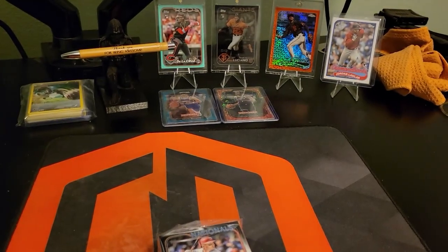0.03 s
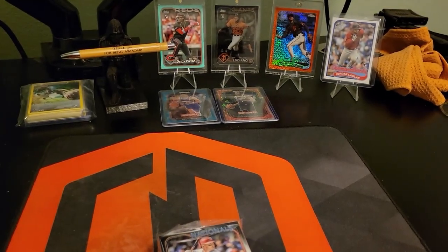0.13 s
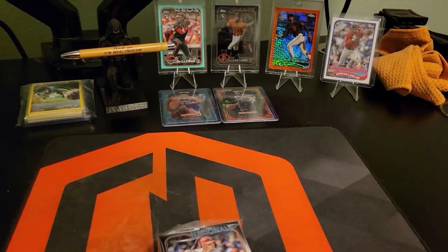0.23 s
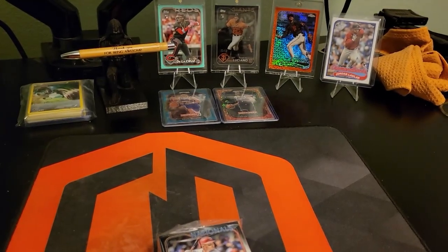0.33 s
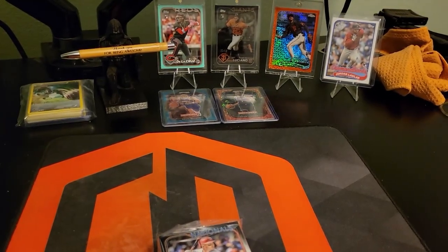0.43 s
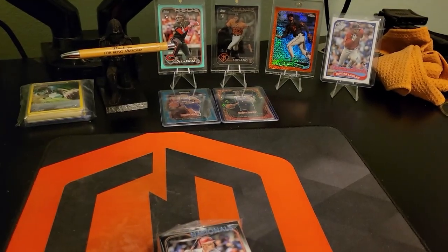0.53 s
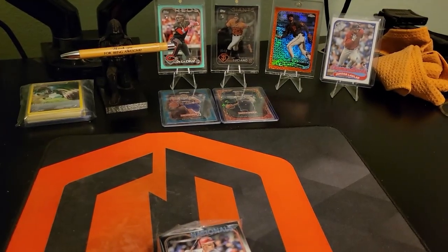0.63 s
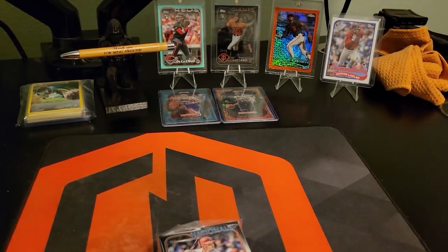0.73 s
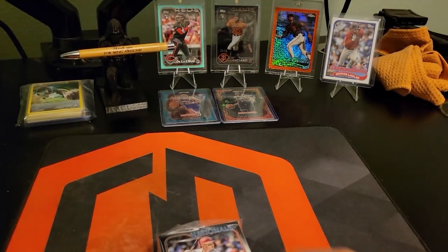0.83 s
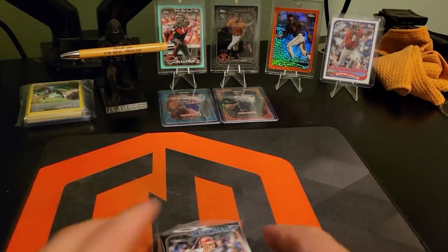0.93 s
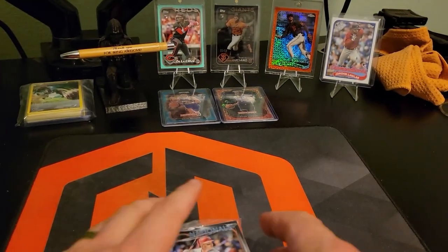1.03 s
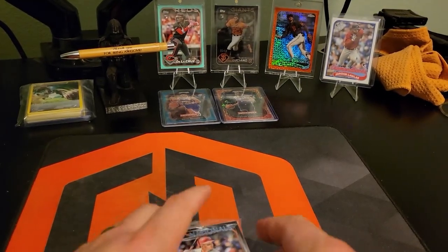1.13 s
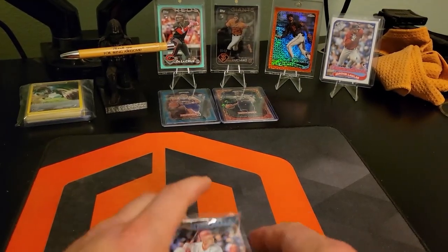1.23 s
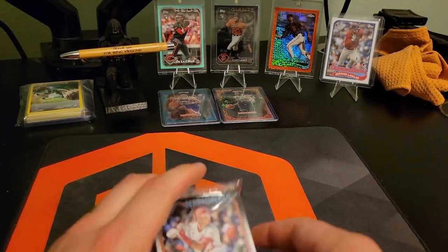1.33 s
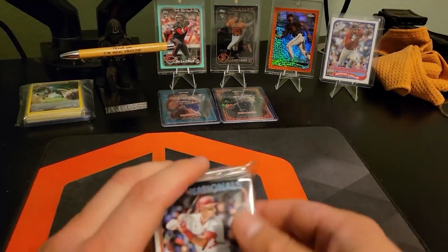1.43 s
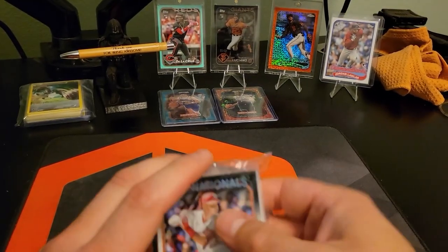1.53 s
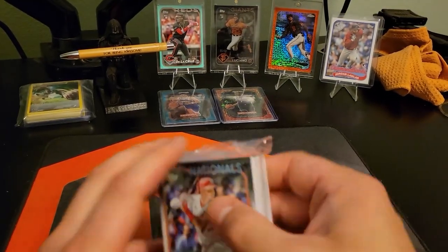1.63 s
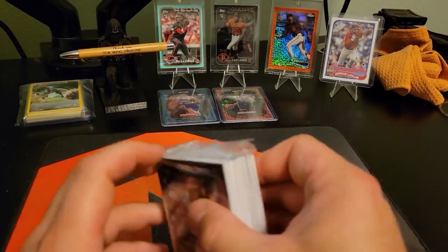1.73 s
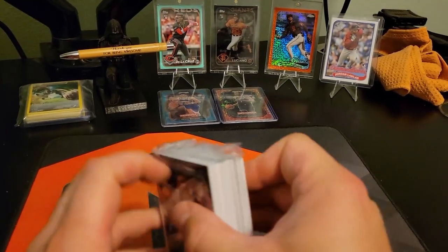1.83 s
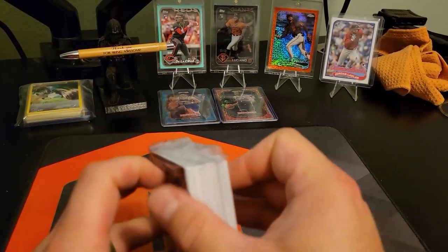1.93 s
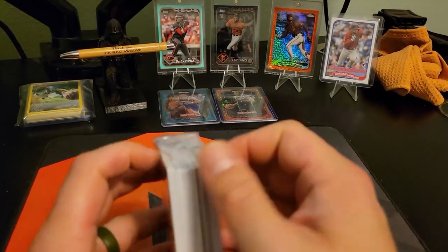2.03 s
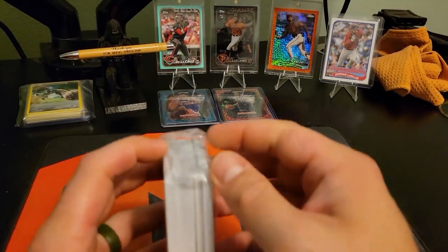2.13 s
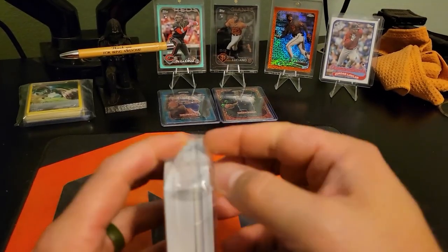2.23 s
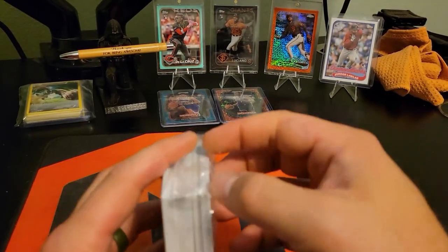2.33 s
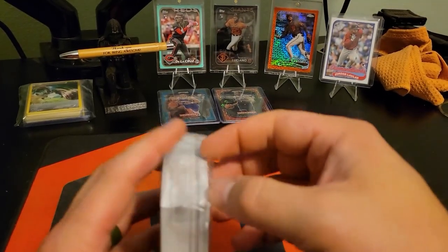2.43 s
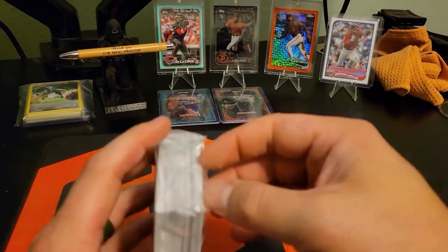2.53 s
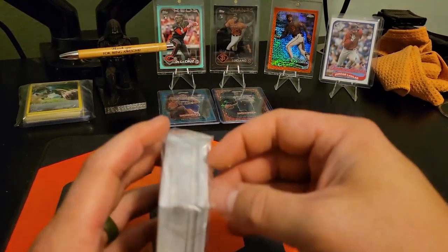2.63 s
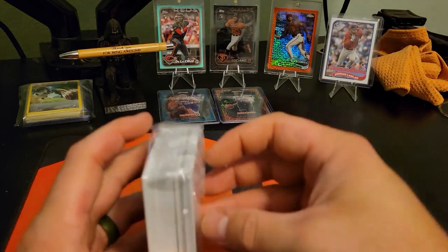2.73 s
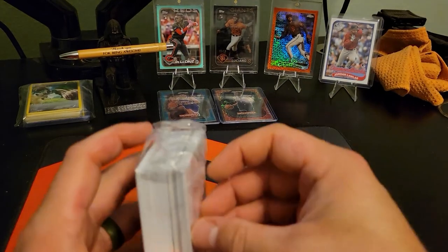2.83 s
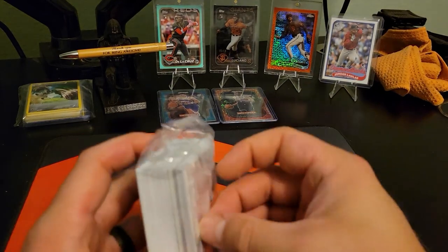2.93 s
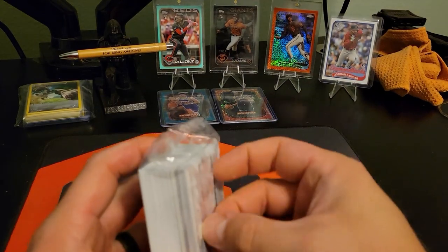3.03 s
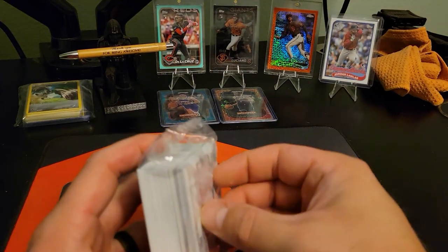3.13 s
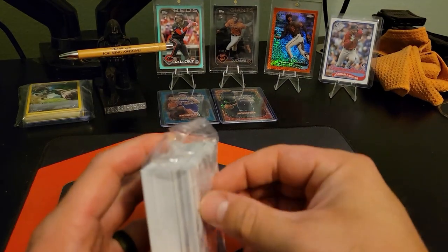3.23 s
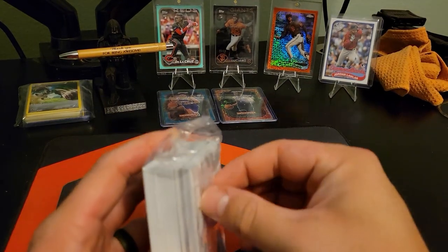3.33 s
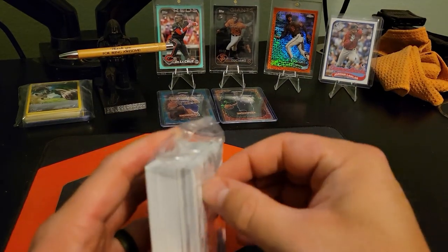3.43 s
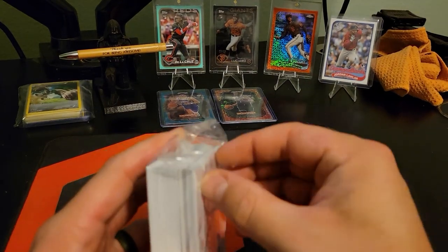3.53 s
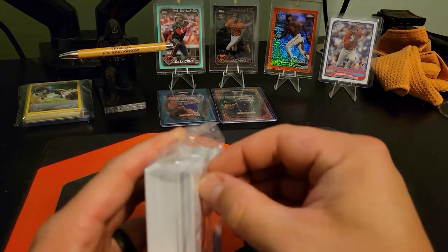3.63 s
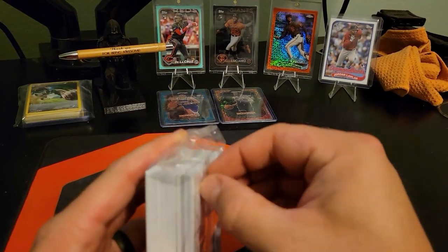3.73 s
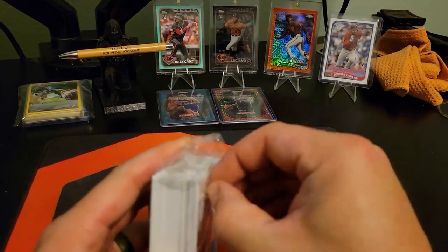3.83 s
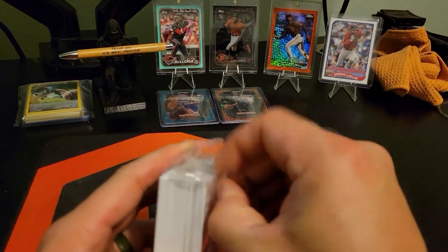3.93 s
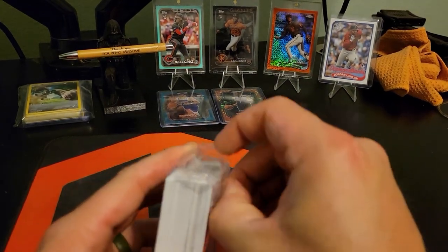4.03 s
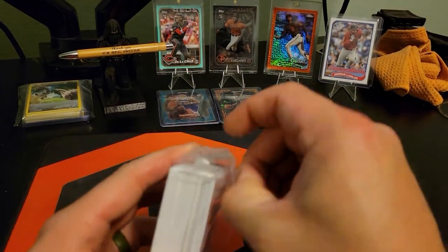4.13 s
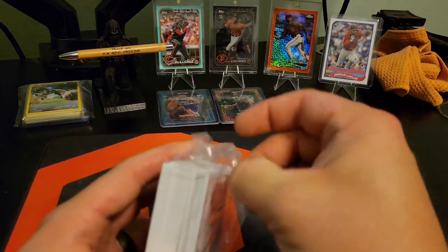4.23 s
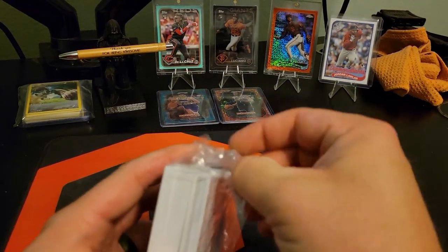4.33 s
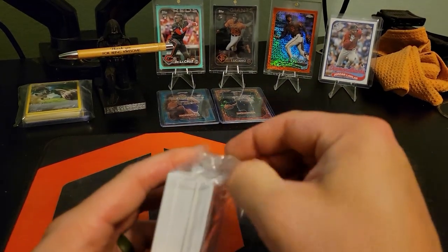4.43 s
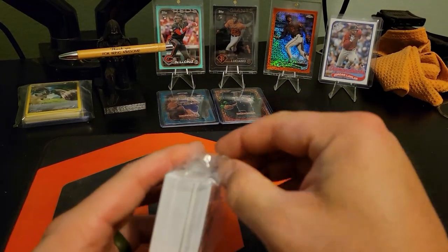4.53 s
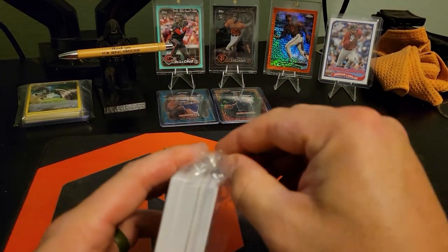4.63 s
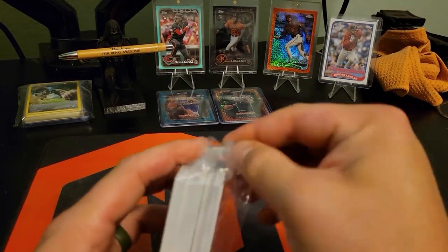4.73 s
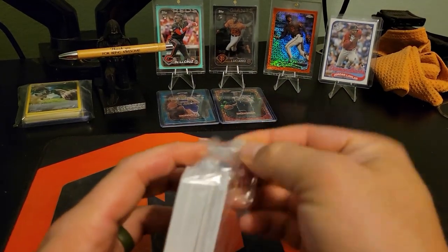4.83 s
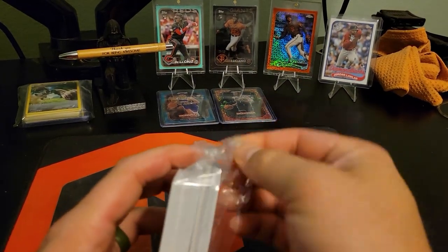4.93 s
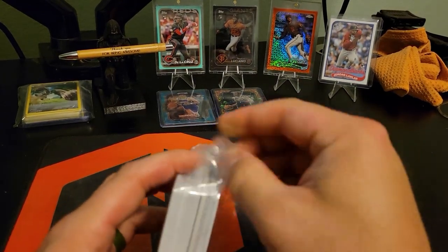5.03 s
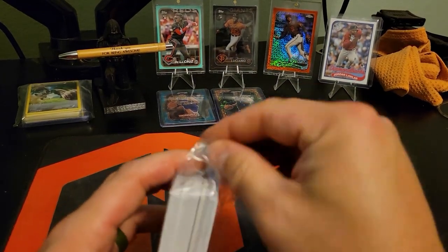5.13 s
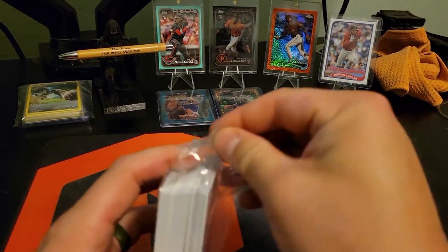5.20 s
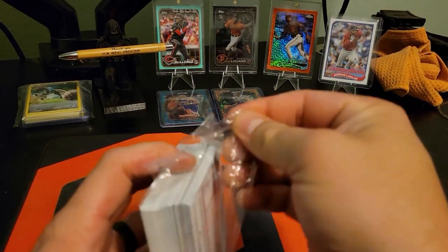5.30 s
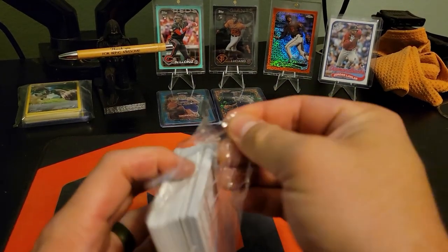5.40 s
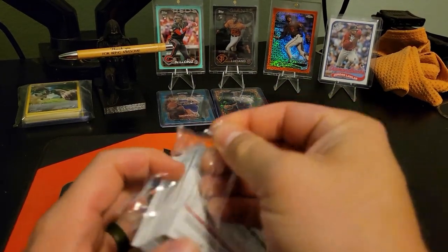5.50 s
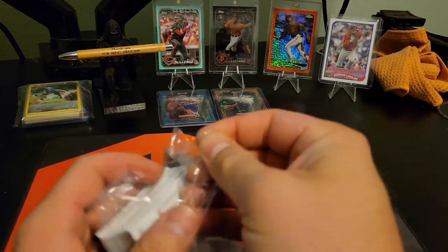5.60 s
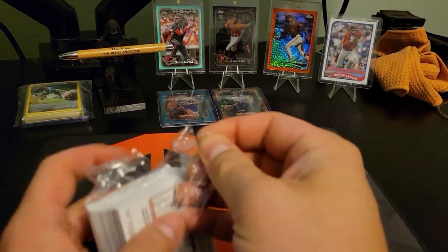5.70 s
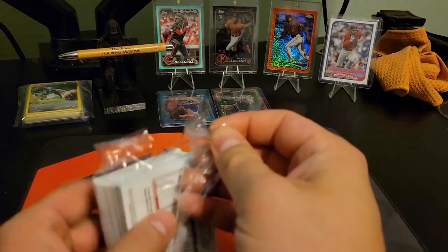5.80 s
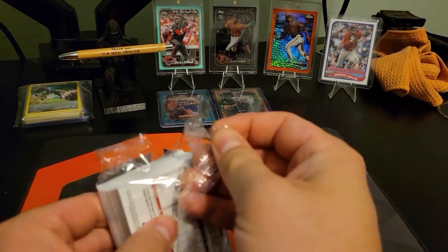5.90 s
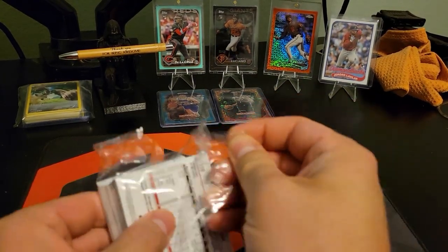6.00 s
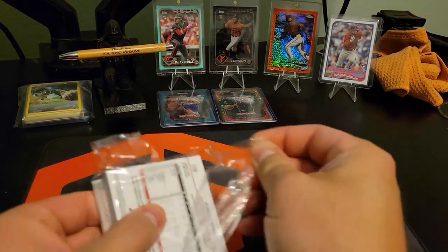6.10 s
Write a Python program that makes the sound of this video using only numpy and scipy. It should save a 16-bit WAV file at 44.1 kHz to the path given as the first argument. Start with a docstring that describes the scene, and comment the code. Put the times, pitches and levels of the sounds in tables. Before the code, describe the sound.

Short soft scrape and dull bumps on a desk, then hands crinkle and pull a stiff plastic wrapper in crisp, increasingly dense crackles.

```python
"""Something slides over a padded desk top, then two hands work a stiff plastic wrapper off a pack of cards near a phone.
Each crease of the film snaps in a dry, broadband click made of short noise bursts; small snaps come in swarms.
The slide is three colours of noise that swell and fade; the pack knocks dully as short, fading tones.
A small room adds a short tail to the snaps; below lies a quiet floor of noise with mains hum and thin whines.
Slide and snaps reach the left port a little before the right one."""
import sys
import numpy as np
from scipy import signal
from scipy.fft import rfft, irfft
from scipy.io import wavfile
from scipy.ndimage import uniform_filter1d

SR = 44100
rng = np.random.default_rng(int(sys.argv[2]) if len(sys.argv) > 2 else 0)


def persist_wave(psi):
    """Save psi, clipped to +-1, as 16-bit WAV."""
    counts = np.round(np.clip(psi, -1, 1) * 32767).astype(np.int16)
    wavfile.write(sys.argv[1], SR, np.atleast_2d(counts).T)


def voltage_ratio(level):
    """Linear amplitude factor for a level in decibels (scalar or array-like)."""
    return 10 ** (np.asarray(level, float) / 20)


N = 271656
T = np.arange(N) / SR


def read(table, hz):
    """Read a spectrum table at the given frequencies, on a log axis."""
    f, values = np.transpose(table)
    return np.interp(np.log(np.maximum(hz, 1)), np.log(f), values)


def curve(table):
    """Read the columns of a time table at every sample."""
    s, *columns = np.transpose(table)
    return [np.interp(T, s, column, left=-120, right=-120) for column in columns]


def level(x, db):
    """Set the rms level, a kind of average loudness."""
    return x * voltage_ratio(db) / np.sqrt(np.mean(x ** 2))


def peak_one(waves):
    """Scale each event (ports x events x samples) so that its envelope peaks at 1."""
    power = uniform_filter1d((waves ** 2).mean(axis=0), size=11)
    return waves / np.sqrt(2 * power.max(axis=1))[:, None]


def hiss(gain, alike_hz, lag_s):
    """Coloured stereo noise: alike in both ports well below alike_hz, unrelated well above; the right port lags."""
    hz = np.fft.rfftfreq(N, 1 / SR)
    mid, side = rfft(rng.standard_normal((2, N)))
    side *= hz ** 2 / (hz ** 2 + alike_hz ** 2)
    left = mid + side
    right = (mid - side) * np.exp(-2j * np.pi * hz * lag_s)
    return level(irfft(gain(hz) * np.array([left, right]), N), 0)


def place(s, waves):
    """Lay the events along the time axis, adding them up where they overlap."""
    size = waves.shape[-1]
    # soft ends, steeper at the start
    power = np.where(np.arange(size) < size / 2, 1 / 4, 1)
    waves = waves * signal.windows.tukey(size, .2) ** power
    at = ((s * SR).astype(int)[:, None] + np.arange(size)).ravel()
    return np.array([np.bincount(at, w.ravel(), N + size)[:N] for w in waves])


# fixed colour of the snaps as picked up, with peaks near 1.8, 3.2 and 12.6 kHz: [f/Hz, relative level/dB]
SNAP_COLOUR = [(300, -12.5), (1010, -3.5), (1790, -2.5), (2090, -5.5), (2840, -7.5), (3210, 0.5),
               (3930, -5.5), (5400, -5.5), (7300, -7.5), (8100, -12.5), (8900, -12), (11000, -8),
               (12600, 0), (14000, -2.5), (15200, -5), (16000, -12)]
# layers of a snap, from crisp edge to low pop:
# [low f/Hz, high f/Hz, typical rise t/s, typical decay t/s, likeness of the ports 0-1]
SNAP_LAYERS = [(5150, 17000, 0.00006, 0.00064, 0.29), (2500, 9140, 0.00096, 0.0025, 0.49),
               (1220, 3150, 0.00044, 0.0023, 1), (318, 1150, 0.00034, 0.0017, 1)]
RIGHT_LAG_S, LAG_SCATTER_S = .000095, .00002
LET_GO_SPREAD = .35  # natural-log scatter of the speed of rise and decay


def creases(s, layers_db, pan_db, size):
    """A crease flips: a very short broadband burst of fixed basic colour, each layer with its own strength."""
    flip_s = .002  # the burst peaks this long after the start of its slot
    t, hz = np.arange(size) / SR - flip_s, np.fft.rfftfreq(size, 1 / SR)
    g = rng.standard_normal((len(s), 5))
    lag = np.exp(-2j * np.pi * hz * (RIGHT_LAG_S + LAG_SCATTER_S * g[:, :1]))
    ports = voltage_ratio(np.array([.5, -.5])[:, None, None] * pan_db[:, None])
    # every patch of film favours its own pitches
    ripple_hz = 900 * np.exp(0.481 * g[:, 2:3])
    ripple_start = 2 * np.pi * rng.random((len(s), 1))
    ripple = voltage_ratio(4.76 * np.cos(hz / ripple_hz + ripple_start))
    # some creases creep a moment before they flip
    creep = np.exp(0.52 * g[:, 4:])
    # some patches of film let go more slowly than others
    speed = np.exp(LET_GO_SPREAD * g[:, 1:2])
    out = 0
    for (low_hz, high_hz, rise_s, decay_s, alike), db in zip(SNAP_LAYERS, layers_db):
        shape = np.exp(np.where(t < 0, t / (rise_s * creep), -t / decay_s) * speed)
        left, other = rfft(rng.standard_normal((2, len(s), size)) * shape)
        # one sharp click just before the peak, at the same moment in all layers
        click = np.sqrt(decay_s * SR) * np.exp(-2j * np.pi * hz * 0.0015)
        left = left + 0.6 * g[:, 3:4] * click
        right = (alike * left + np.sqrt(1 - alike ** 2) * other) * lag
        # soft limits below and above the layer's range
        limits = 1 / (1 + (low_hz / (hz + 1)) ** 6) / (1 + (hz / high_hz) ** 6)
        band = ripple * voltage_ratio(read(SNAP_COLOUR, hz)) * limits
        burst = irfft(ports * band * np.array([left, right]), size)
        out = out + voltage_ratio(db)[:, None] * peak_one(burst)
    return place(s - flip_s, out)


# single loud snaps, peak levels before the room:
# [t/s, crisp edge level/dB, body level/dB, low pop level/dB, left minus right level/dB]
SINGLE_SNAPS = [(0.9332, -40, -43, -61, 4.5), (1.0067, -28.5, -49, -52, 1), (1.04, -36, -33.5, -44, 3),
                (1.1387, -23.5, -32, -42, 5), (1.1928, -34, -32, -41, -1), (1.2248, -34, -25.5, -43, 4),
                (1.2718, -67, -26, -41, -1.0), (1.313, -40, -42, -63, -0.5), (1.3503, -44, -39, -47, 1.0),
                (1.3975, -15.5, -38, -33, -0.5), (1.437, -41, -43, -45, 1), (1.4828, -24.5, -38, -71, -2.5),
                (1.517, -21.5, -58, -59, 5), (1.5364, -26, -50, -65, 13), (1.5676, -8.5, -58, -54, -0.5),
                (1.5994, -14.5, -53, -51, 4), (1.6188, -16.5, -43, -50, 15), (1.704, -21, -59, -47, 1.0),
                (1.7195, -12.5, -32, -48, 7), (1.7392, -23, -34, -60, 0.5), (1.7886, -25.5, -54, -62, 1),
                (1.8706, -49, -78, -57, 6), (1.9125, -33, -47, -47, 5), (1.9975, -23, -37, -63, 2.0),
                (2.0195, -21, -30.5, -46, 2), (2.0567, -9.5, -38, -51, 2.5), (2.0727, -24, -42, -49, 2.0),
                (2.094, -15, -40, -52, 21), (2.106, -17, -44, -52, 4), (2.1681, -44, -31, -38, 6),
                (2.2201, -25, -31, -41, 5), (2.2329, -12, -49, -48, 6), (2.2466, -16, -31.5, -43, -3),
                (2.295, -18, -50, -61, 1.5), (2.3348, -16, -41, -57, 22), (2.36, -16, -65, -58, -2),
                (2.3795, -11, -35, -49, -2), (2.3988, -13.5, -22, -30, 4), (2.4295, -11.5, -27, -39, 9),
                (2.444, -15, -48, -36, -2), (2.454, -11, -35, -40, 0.0), (2.4703, -10.5, -26, -38, 1),
                (2.5, -19, -45, -54, 0.5), (2.5302, -14, -44, -46, 11), (2.537, -14, -49, -56, 0.0),
                (2.5565, -7.5, -35.5, -55, 5), (2.5747, -11.5, -36, -56, 0.0), (2.592, -16, -41, -58, -4),
                (2.61, -19, -45, -55, 3), (2.6612, -28, -46, -61, -1.5), (2.686, -17.5, -42, -50, -5),
                (2.6969, -12.5, -30, -51, -8), (2.7272, -16.5, -28, -56, 7), (2.792, -15, -40, -37, 2),
                (2.81, -9, -30.5, -33, 6), (2.8964, -20, -24.5, -42, 0), (2.9066, -17, -51, -52, 3.5),
                (2.9146, -20, -39, -54, 6), (2.9766, -12, -26.5, -34, -2), (2.9948, -7.5, -41, -42, 3),
                (3.028, -15.5, -31.5, -47, -3), (3.1163, -11.5, -40.5, -60, 18),
                (3.125, -14, -45, -62, -13), (3.1361, -14, -52, -63, 0), (3.1495, -9, -37, -51, 6),
                (3.1577, -3.5, -21.5, -45, 0), (3.2108, -21, -23, -27.5, 1), (3.2822, -13, -30, -48, 7),
                (3.3041, -23, -23.5, -43, -13), (3.3485, -34, -34.5, -64, 6), (3.3807, -17.5, -56, -60, 5),
                (3.3922, -25, -34.5, -59, 0.0), (3.4456, -12.5, -26.5, -58, 1.5), (3.48, -14, -32, -50, 3),
                (3.492, -12, -33, -50, -8), (3.5163, -5.5, -17, -67, 0.5), (3.554, -13, -41, -61, 6),
                (3.576, -16.5, -34, -63, 2), (3.5892, -8, -34, -59, -2.0), (3.609, -17.5, -38, -59, 0),
                (3.727, -27, -60, -68, 6), (3.7643, -18.5, -58, -59, 2), (3.7865, -16, -57, -61, -6),
                (3.7985, -21, -36, -52, 0.0), (3.8178, -8, -49, -57, 1.5), (3.8758, -26, -31, -58, -3.0),
                (3.922, -14, -32, -39, 4), (3.9579, -16.5, -38, -41, -5), (3.9751, -13, -19, -34, 8),
                (4.0265, -14, -30, -54, 6), (4.0366, -10.5, -31, -49, 1), (4.0622, -18, -21, -41, 0.5),
                (4.0995, -15, -32, -29, 3), (4.1104, -12, -40, -50, 10), (4.1185, -10, -38, -46, 5),
                (4.1355, -25, -23.5, -38, 2.5), (4.147, -10, -29, -51, 1.0), (4.1613, -14, -39, -48, -0.5),
                (4.1835, -20, -24.5, -31, 4), (4.2045, -11, -30, -33, 2.0), (4.2128, -15, -25, -36, 5),
                (4.2252, -11.5, -8.5, -34, 3), (4.2434, -14, -34, -47, 8), (4.2559, -22, -12.5, -22, 1.5),
                (4.2807, -14, -42, -46, -1), (4.2894, -6, -48, -49, 8), (4.3317, -15, -39, -45, 8),
                (4.348, -12, -41, -38, -4), (4.3619, -11, -54, -56, 4.5), (4.4168, -13, -66, -48, 11),
                (4.428, -13, -54, -61, 9), (4.477, -15.5, -31, -36, 8), (4.5181, -9.5, -38, -33, 0),
                (4.536, -6.5, -22, -31, -5.5), (4.5856, -17, -45, -48, 1), (4.6582, -9.5, -46, -36, 8.5),
                (4.6912, -23, -28, -51, -0.5), (4.7037, -18, -27, -41, 4), (4.7172, -11.5, -24.5, -51, -10),
                (4.7258, -8.5, -25, -49, 14), (4.7386, -12, -25, -47, -6), (4.7525, -24, -13.5, -27, 2),
                (4.7603, -5, -27, -36, -2), (4.781, -13, -18, -24, 1.0), (4.8065, -30, -22, -40, 0.0),
                (4.8308, -17, -21, -50, 5), (4.8442, -7, -36, -36, 3), (4.869, -13, -19.5, -38, -1.5),
                (4.9285, -17, -45, -55, 1.5), (4.9448, -8, -35, -53, 0.5), (4.9787, -7, -51, -47, 12),
                (4.993, -28, -31, -29, -3), (5.003, -24, -15, -28, 2), (5.0089, -19, -16, -32, 6),
                (5.03, -10, -38, -45, 5), (5.0503, -7, -35, -38, 5), (5.0652, -31, -18.5, -25.5, 6),
                (5.0724, -9, -19, -46, 8), (5.083, -13, -35, -46, 14), (5.0901, -6.5, -31, -44, 1),
                (5.1218, -8.5, -24, -49, 7), (5.1566, -15, -30, -56, 3), (5.1821, -22, -39, -56, 8),
                (5.2101, -12, -25, -49, 1), (5.2173, -15, -28, -32, 8), (5.2283, -19, -24, -43, 16),
                (5.2405, -1, -18, -39, 1), (5.2482, -12.5, -13, -39, 5), (5.2679, -9, -40, -44, 9),
                (5.2736, -14, -27, -46, 4), (5.3287, -33, -52, -53, -0.5), (5.3647, -12, -27.5, -29.5, 5),
                (5.3784, -13, -37, -44, 5), (5.4007, -14.5, -21.5, -44, 1), (5.4592, -15.5, -29.5, -39, 5),
                (5.5235, -21, -45, -59, 4), (5.5826, -17, -27.5, -51, 8), (5.5986, -13, -34, -48, 0.5),
                (5.6296, -19, -21, -54, 19), (5.6532, -18, -31, -49, 6), (5.672, -20, -30.5, -37, 7),
                (5.7254, -31, -42, -45, 22), (5.735, -6, -32.5, -40, 10), (5.8185, -26, -46, -43, 14),
                (5.8332, -5.5, -34, -59, 14), (5.8725, -17.5, -34, -36, 2), (5.9189, -22, -50, -51, -2),
                (5.9339, -16, -54, -46, 4), (5.953, -8, -25.5, -50, 6), (5.9863, -12, -40, -45, 10),
                (5.9998, -10, -49, -39, 2.5), (6.0246, -3.5, -53, -39, 6), (6.0419, -2, -44, -39, 4),
                (6.0506, -1, -45, -31, 8), (6.0651, -8, -61, -20.5, 10), (6.069, 3, -49, -32, 6),
                (6.0792, -5, -26, -22, -4), (6.0924, -1, -51, -31, -1), (6.1, -17, -35, -21.5, -3),
                (6.11, -10, -21, -26, -7), (6.117, -16, -47, -39, 12), (6.124, 0, -49, -37, 10),
                (6.1296, -14, -47, -32, 13), (6.1434, -5, -48, -23, 0), (6.1504, -19, -37, -22, 2.0)]


def snaps():
    """The loud single snaps: four layers each; the crackle is set from the mean of edge and body."""
    s, edge_db, body_db, pop_db, pan_db = np.transpose(SINGLE_SNAPS)
    crackle_db = (edge_db + body_db) / 2 + 2.5 + 2.0 * rng.standard_normal(len(s))
    return creases(s, [edge_db, crackle_db, body_db, pop_db], pan_db, size=512)


# the swarm of small snaps while the pack is merely held and turned: [t/s, level/dB]
HELD_PACK = [(.9, -70), (1.0, -50), (1.12, -49.5), (1.22, -38), (1.45, -57), (1.86, -52.5), (2.2, -38.5),
             (2.7, -39), (2.93, -48), (3.25, -42), (3.74, -50), (4.0, -39.5), (4.45, -39), (4.63, -41),
             (4.93, -38), (5.4, -39), (5.8, -50), (6.16, -38)]
# squeezes and pulls that thicken the swarm: [start t/s, length t/s, level/dB]
SQUEEZE_PULLS = [(1.009, 0.025, -42.5), (1.537, 0.087, -32), (1.716, 0.042, -35.5), (2.036, .07, -31.5),
                 (2.395, 0.075, -31), (2.525, 0.045, -33), (2.974, 0.022, -31), (3.128, 0.15, -34.5),
                 (3.482, 0.15, -32.5), (3.781, .03, -35), (3.918, 0.056, -31), (4.082, 0.053, -25.5),
                 (4.2, 0.086, -24), (4.467, 0.048, -28), (4.719, 0.068, -19), (4.846, 0.013, -14.5),
                 (5.007, 0.093, -24), (5.218, 0.041, -18.5), (5.379, 0.055, -40), (5.596, 0.1, -32.5),
                 (5.829, 0.069, -35.5), (5.937, .1, -24), (6.058, 0.12, -19.5)]
ATTACK_DB_PER_S, RELEASE_DB_PER_S = 902, 400


def effort():
    """Level of the swarm in dB: the held pack plus each squeeze, which rises, holds and lets go."""
    power = voltage_ratio(2 * curve(HELD_PACK)[0])
    for s, length_s, db in SQUEEZE_PULLS:
        rise_db = ATTACK_DB_PER_S * np.maximum(s - T, 0)
        fall_db = RELEASE_DB_PER_S * np.maximum(T - s - length_s, 0)
        power = power + voltage_ratio(2 * (db - rise_db - fall_db))
    return 10 * np.log10(power)


def swarm():
    """Thousands of small snaps at random moments, their loudness swelling and fading in bunches."""
    db = effort()
    start_s = HELD_PACK[0][0]
    s = np.sort(start_s + (N / SR - start_s) * rng.random(4500))
    at = (s * SR).astype(int)
    # e makes a few snaps much larger than the rest
    e, g = rng.exponential(size=len(s)), rng.standard_normal((len(s), 4))
    # neighbouring snaps grow and shrink together
    bunch = uniform_filter1d(rng.standard_normal(len(s)), size=12) * np.sqrt(12)
    # gentle handling gives lone ticks; in a hard crumple the sizes even out
    uneven = np.clip((-12.0 - db[at]) / 27.0, .35, 1.2)
    edge_db = uneven * (3.8 * np.minimum(e, 3.5) + 5.1 * bunch)
    # harder crumpling bends larger folds, which adds lows
    low_db = edge_db - 14 + 0.09 * (db[at] + 29.5)
    crackle_db = edge_db - 8.0 + 1.35 * g[:, 0]
    body_db = low_db - 3.0 + 5.2 * g[:, 1]
    pop_db = low_db - 9.0 + 2.5 * g[:, 2]
    pan_db = 5 * g[:, 3]  # left minus right
    crackle = creases(s, [edge_db, crackle_db, body_db, pop_db], pan_db, size=256)
    # the hands set the level over a third of a second
    usual_power = uniform_filter1d((crackle ** 2).mean(axis=0), size=15000)
    return crackle * voltage_ratio(db) / np.sqrt(usual_power + 1e-6)


# resonances of the desk: [f/Hz, width f/Hz, relative level/dB]
DESK_MODES = [(97, 15, -21), (180, 49, 12.5), (220.7, 22, 9), (297, 26, 7), (341.4, 13, 5.5), (534, 52, 2),
              (776, 490, -3.5)]


def desk_colour(hz):
    """Sum of the desk's resonances, each strongest at its own pitch, with the deepest bass held back."""
    modes = sum(voltage_ratio(db) / np.hypot(1, 2 * (hz - f) / width) for f, width, db in DESK_MODES)
    return modes * hz ** 2 / (hz ** 2 + 60 ** 2)


# the slide: [t/s, desk rumble level/dB, mat rasp level/dB, fine hiss level/dB]
SLIDE_LEVELS = [(0.0, -92, -84, -81), (0.018, -68, -78, -76), (0.038, -40, -37, -44),
                (0.078, -28, -41, -47), (0.128, -28, -49, -74), (0.152, -31.5, -37.5, -37),
                (0.228, -42, -37.5, -42), (0.274, -34, -37.5, -44), (0.428, -58.5, -54, -58),
                (0.518, -44.5, -46.5, -46), (0.574, -44.5, -53, -60), (0.62, -55, -64, -65),
                (0.78, -86, -83, -82)]
SLIDE_LAG_S = 0.000367


def slide():
    """Friction shakes the desk modes, rasps on the mat and hisses finely."""
    desk_db, rasp_db, fine_db = curve(SLIDE_LEVELS)
    # the rumble wavers as the grip changes
    waver = level(uniform_filter1d(rng.standard_normal(N), size=500), 0)
    grip = voltage_ratio(1.7 * waver)
    desk = level(grip * hiss(desk_colour, 870, SLIDE_LAG_S), 0)
    rasp = hiss(lambda hz: (hz / 900) ** 2 / (1 + (hz / 900) ** 3.14), 900, SLIDE_LAG_S)
    fine = hiss(lambda hz: 1 / np.hypot(1, (hz - 12500) / 3000), 3300, SLIDE_LAG_S)
    return desk * voltage_ratio(desk_db) + rasp * voltage_ratio(rasp_db) + fine * voltage_ratio(fine_db)


# dull knocks through pack and desk: [t/s, peak level/dB, f/Hz]
DULL_KNOCKS = [(0.269, -26, 223), (0.451, -43.5, 345), (0.545, -31.5, 176), (0.567, -31, 180),
               (1.209, -48, 313), (1.72, -48, 214), (2.616, -48, 122), (2.717, -45.5, 40.2),
               (2.809, -43, 166), (3, -51.5, 84), (3.209, -44.5, 500), (3.301, -57, 54.4),
               (4.098, -29.5, 336), (4.253, -41, 553), (4.868, -45, 366), (4.997, -39, 566),
               (5.072, -38.5, 420), (5.218, -37, 560), (5.279, -40, 370), (5.677, -38, 186),
               (5.947, -39.5, 351), (6.054, -33, 503), (6.115, -32.5, 375)]
KNOCK_CYCLES = 2.8  # cycles in which a knock's own tone falls to 37 percent


def knocks():
    """A soft push sounds each knock's own pitch and, weaker, the desk modes."""
    s, db, pitch_hz = np.transpose(DULL_KNOCKS)
    t = np.arange(6000) / SR
    own_fade = np.exp(-t * (pitch_hz / KNOCK_CYCLES)[:, None])
    own = np.sin(2 * np.pi * pitch_hz[:, None] * t) * own_fade
    desk = 0
    for hz, width, mode_db in DESK_MODES:
        desk = desk + voltage_ratio(mode_db) * np.sin(2 * np.pi * hz * t) * np.exp(-np.pi * width * t)
    # silent for 14 ms, then a soft start
    push = np.clip(1 - np.exp(-(t - .014) / 0.0033), 0, 1)
    wave = (own + voltage_ratio(-22.5) * desk) * push
    return place(s - .017, voltage_ratio(db)[:, None] * peak_one(np.array([wave, wave])))


TAIL_DULL_DB, TAIL_BRIGHT_DB = -38, -38  # gains of the two parts of the tail
TAIL_DULL_T60_S, TAIL_BRIGHT_T60_S = .45, .22  # time to fall by 60 dB


def room(x):
    """An early bounce off the desk, then a diffuse tail that loses treble first."""
    t = np.arange(int(.4 * SR)) / SR
    noise = rng.standard_normal((2, 2, len(t))) * (1 - np.exp(-t / 0.00033))
    dull = signal.lfilter(*signal.butter(2, 5000, fs=SR), noise[0])
    dull = dull * np.exp(-np.log(1000) * t / TAIL_DULL_T60_S)
    bright = noise[1] * np.exp(-np.log(1000) * t / TAIL_BRIGHT_T60_S)
    tail = voltage_ratio(TAIL_DULL_DB) * dull + voltage_ratio(TAIL_BRIGHT_DB) * bright
    # long waves barely fill a small soft room
    tail = signal.lfilter(*signal.butter(2, 800, "high", fs=SR), tail)
    # the early bounce, at its own delay (in samples) for each port
    tail[0, 110] += .2
    tail[1, 123] += .2
    return x + signal.fftconvolve(x.mean(axis=0)[None], tail)[:, :N]


# colour of the quiet floor: [f/Hz, relative level/dB]
FLOOR_COLOUR = [(15, -36), (25, 2), (64, -9), (87, -12), (123, -4.5), (145, -4.5), (195, -4.5),
                (293, -11.5), (363, -8), (439, -18.5), (1700, -26.5), (8360, -44), (16000, -19.5)]
FLOOR_DB = -62.5
# mains hum: [f/Hz, rms level/dB]
MAINS_HUM = [(120, -77), (360.7, -72.5)]
# thin, high whines: [f/Hz, rms level/dB]
THIN_WHINES = [(14422, -90), (15418, -84)]


def quiet():
    """Room air and electronics: steady coloured noise, with mains hum and thin whines as pure tones."""
    tones = 0
    for hz, db in MAINS_HUM + THIN_WHINES:
        tones = tones + np.sqrt(2) * voltage_ratio(db) * np.sin(2 * np.pi * hz * T)
    return voltage_ratio(FLOOR_DB) * hiss(lambda hz: voltage_ratio(read(FLOOR_COLOUR, hz)), 310, 0) + tones


def scene():
    """The snaps in the room, with knocks and slide, over the floor."""
    return room(snaps() + swarm()) + knocks() + slide() + quiet()


def roll_off(x):
    """The treble ends steeply here."""
    return signal.sosfilt(signal.butter(12, 17000, fs=SR, output="sos"), x)


# colour difference of the two ports: [f/Hz, left minus right level/dB]
PORT_COLOURS = [(2800, -0.5), (3200, 0), (3700, -4), (7700, -2.5), (8800, 12), (10900, 3), (12200, -5),
                (15000, -6.5)]
CEILING, KNEE, TOP_HZ = .8, 4, 15900  # limit of the rounding, its sharpness, edge of the top roll-off


def record(dry):
    """Each port has its own colour; the phone rounds the loudest peaks, rolls off deep bass and the very top."""
    hz = np.fft.rfftfreq(N, 1 / SR)
    tilt_db = np.array([[.5], [-.5]]) * read(PORT_COLOURS, hz)
    ports = irfft(rfft(dry) * voltage_ratio(tilt_db), N)
    rounded = ports / (1 + (ports / CEILING) ** KNEE) ** (1 / KNEE)
    thin = signal.sosfilt(signal.butter(2, 40, "high", fs=SR, output="sos"), rounded)
    mix = signal.sosfilt(signal.ellip(6, .3, 24, TOP_HZ, fs=SR, output="sos"), thin)
    return roll_off(mix)


dry = scene()
out = record(dry)
persist_wave(out)
```